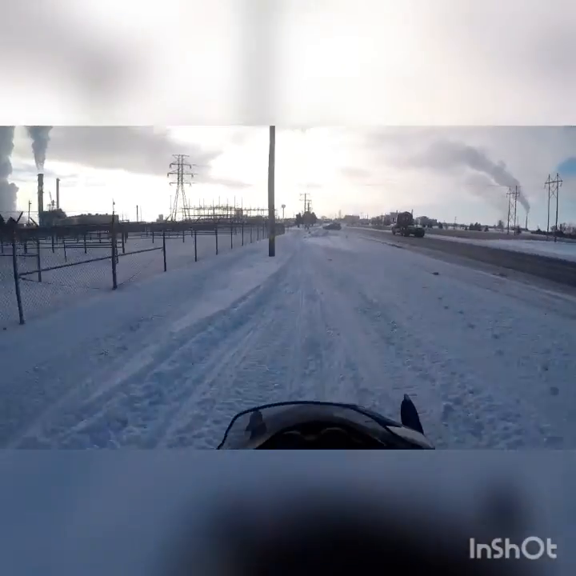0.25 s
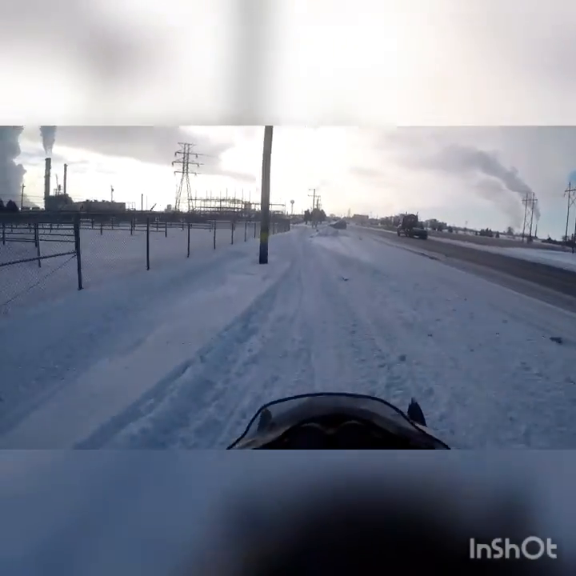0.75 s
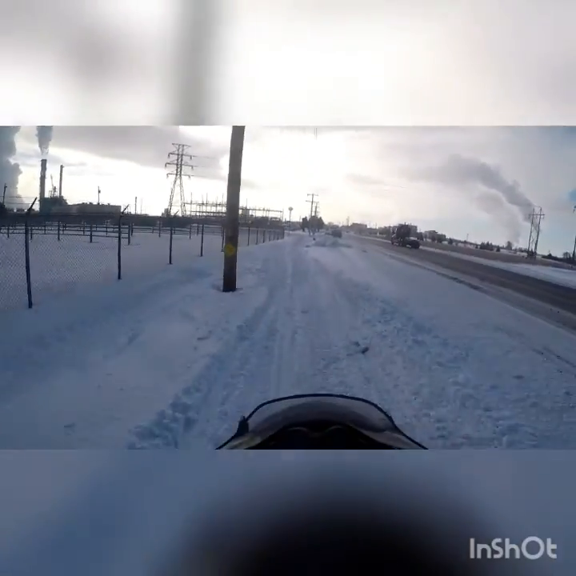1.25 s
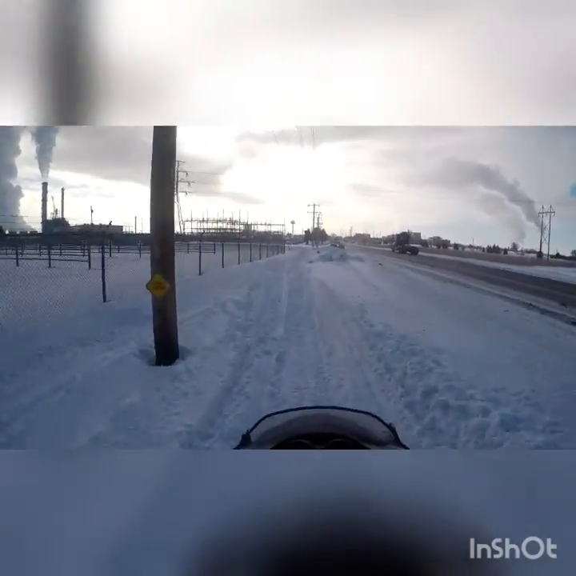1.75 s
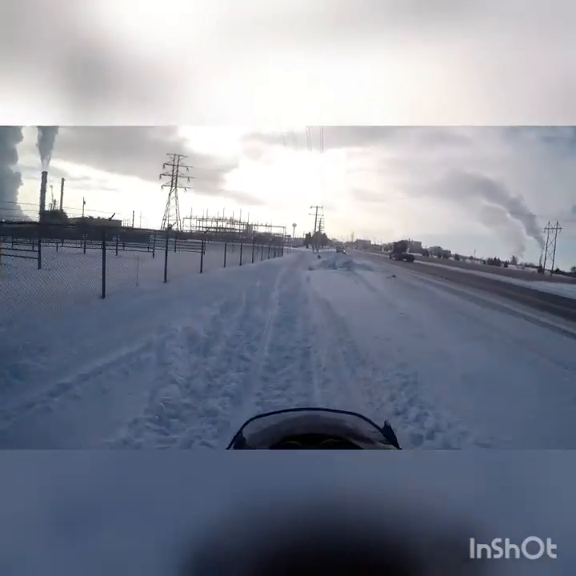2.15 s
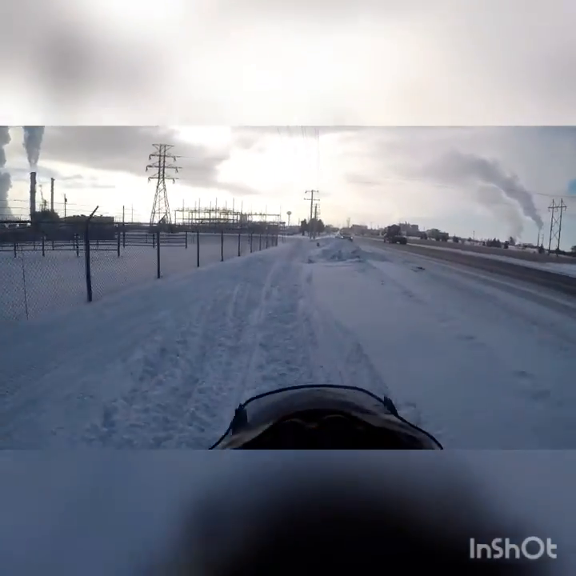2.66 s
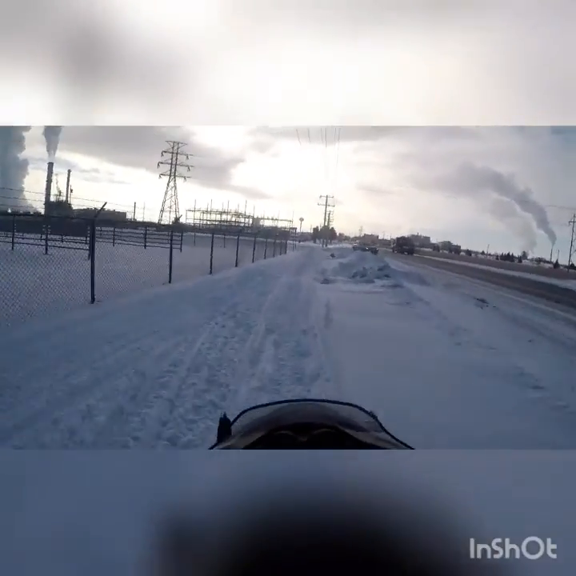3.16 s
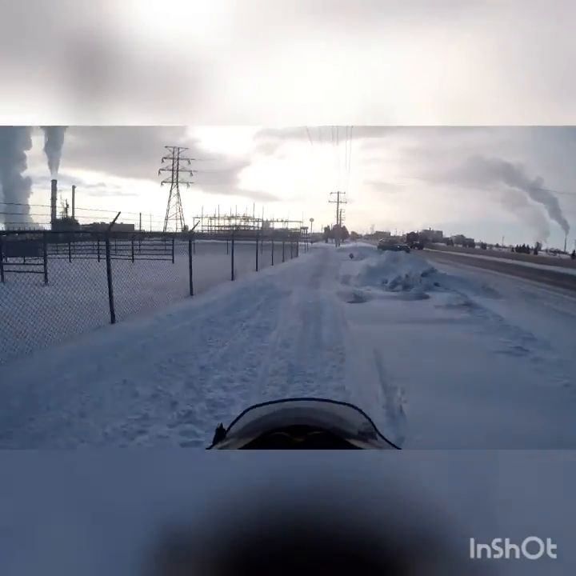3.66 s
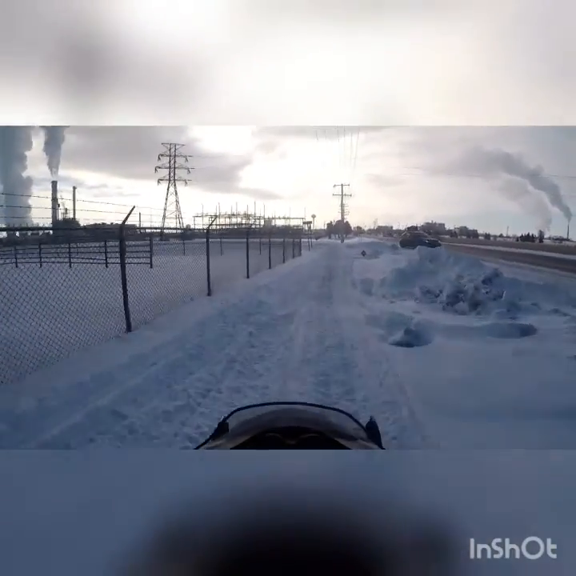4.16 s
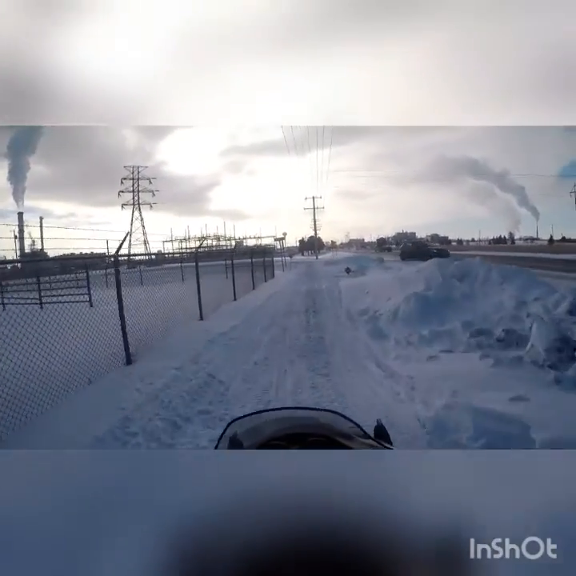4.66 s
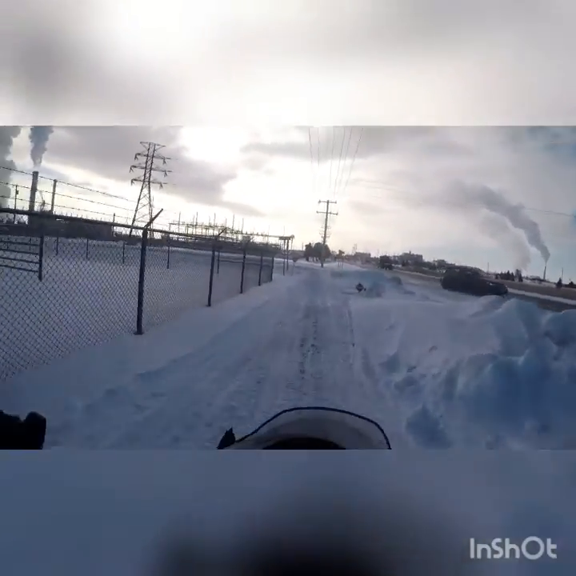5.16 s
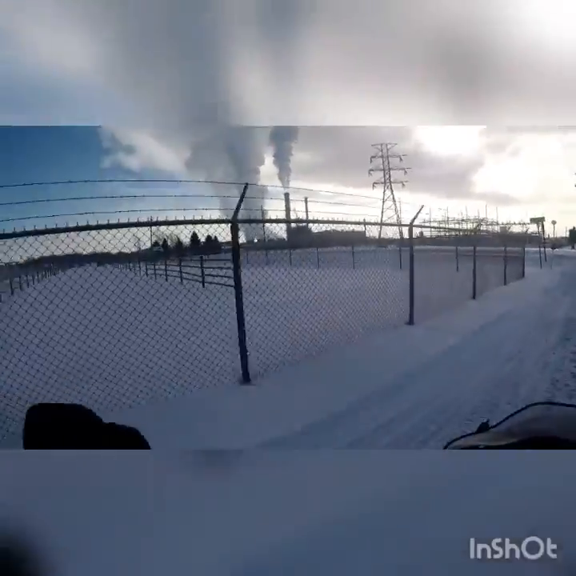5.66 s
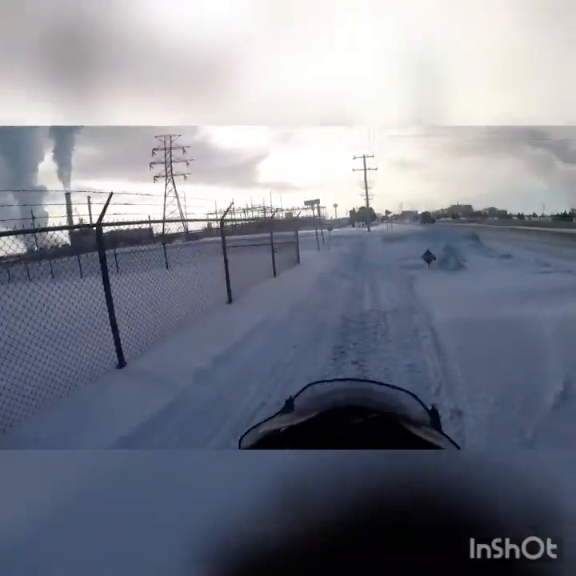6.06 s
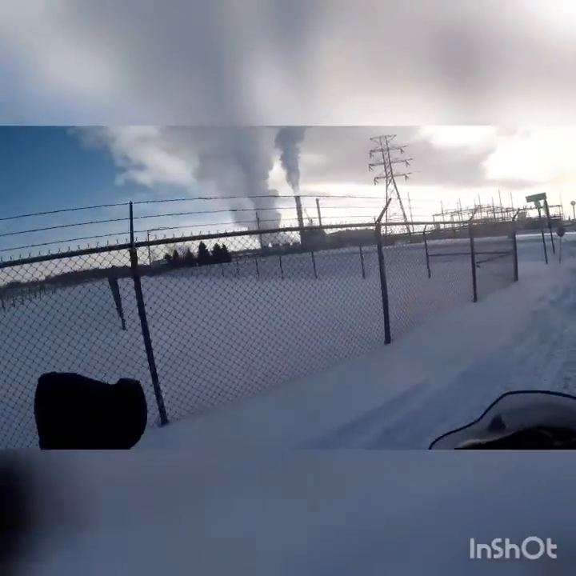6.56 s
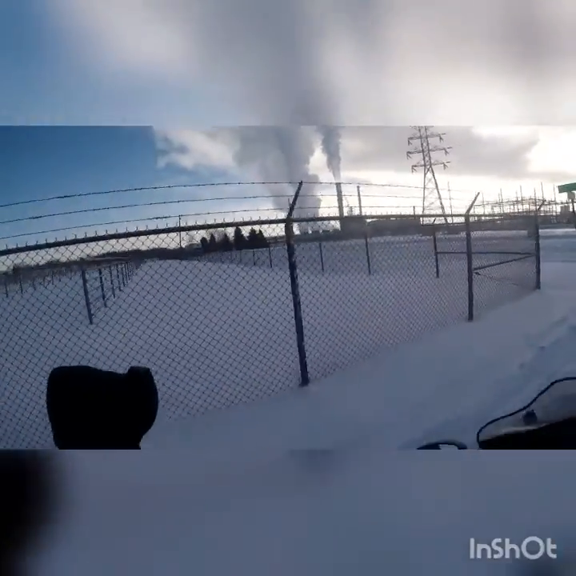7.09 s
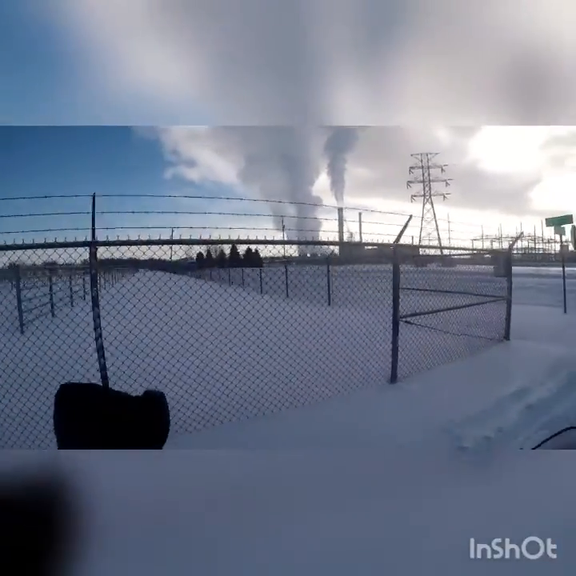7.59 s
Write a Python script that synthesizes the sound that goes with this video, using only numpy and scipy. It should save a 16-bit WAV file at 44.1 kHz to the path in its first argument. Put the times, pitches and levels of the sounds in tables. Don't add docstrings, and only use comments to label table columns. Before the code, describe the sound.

An onboard helmet microphone rides with a snowmobile on an open snowy track. From 0 s a raspy two-stroke engine drones, muffled and centred, over low wind rumble and a faint fluttering hiss of snow. Its pitch falls quickly in the first half second, then holds with small wavers; a barely audible knock comes at 0.8 s. Between about 3.15 and 3.6 s the sound opens into a much louder, wider stereo buzz, with strong track-belt boom and a hollow, resonant midrange. A hard low thump lands at 3.6 s, stronger on the left. From 3.4 to 6.1 s brief plastic rattles mark ruts. The engine sinks gradually to a lower, rough, steady drone by 5 s, lifting slightly around 6.8 s. A softer left-leaning knock and faint rattle come near 7.2 s; the drone continues to the end at about 7.8 s.

```python
import sys
import numpy as np
from scipy import signal
from scipy.fft import rfft, irfft, next_fast_len
from scipy.io import wavfile
from scipy.ndimage import uniform_filter1d

SR = 44100
rng = np.random.default_rng(int(sys.argv[2]) if len(sys.argv) > 2 else 0)


def level_to_linear(level):
    exponent = np.asarray(level, float) / 20
    return 10 ** exponent


def inscribe(sig):
    pcm = np.round(np.clip(np.atleast_2d(sig).T, -1, 1) * 32767)
    wavfile.write(sys.argv[1], SR, pcm.astype(np.int16))


N = 345303
TIME = np.arange(N) / SR
SIZE = next_fast_len(N + SR // 2)
HZ = np.arange(SIZE // 2 + 1) * SR / SIZE
STEREO_FROM_S, STEREO_FADE_S = 3.151, 0.46


# time_s, crank_hz, order3_db, order6_db, order7_db, order9_db
ENGINE_RUN = [(0.0, 77, 12, 13, 12, 20), (0.2, 72, 10, 11, 10, 19), (0.4, 68, 3, 12, 15, 18),
              (0.6, 67, 8, 11, 10, 17), (0.8, 68, 8, 12, 8, 16), (1.0, 68, 5, 13, 5.4, 17),
              (1.2, 66.4, 6, 15, 8, 14), (1.4, 63.5, -2, 12, 10, 13), (1.6, 65.5, 7, 11, 8.3, 16),
              (1.8, 65.0, 7, 11, 8, 20), (2.0, 67, 9.5, 12, 5, 22), (2.2, 69, 9.5, 10, 3.3, 20),
              (2.4, 69, 13.5, 7, 3, 25), (2.6, 70, 15, 9, 6, 20), (2.8, 67, 17.5, 11, 8, 16),
              (3.0, 65.2, 10.5, 11, 8, 16), (3.2, 64.7, 24, 10, 10, 16), (3.4, 66, 24.5, 13, 10, 15),
              (3.6, 64, 26.5, 13, 10, 18), (3.8, 63.4, 20, 15, 18, 15), (4.0, 63, 22.5, 15, 16, 12),
              (4.2, 60, 14, 16, 20, 17), (4.4, 59.4, 20, 16, 23, 14), (4.6, 59.5, 18, 18, 15, 17),
              (4.8, 56.5, 7, 14, 10, 11), (5.0, 56.4, 7, 18, 8.8, 10), (5.2, 56.3, 13, 16, 12, 9.6),
              (5.4, 56.2, 11, 12, 11, 9.6), (5.6, 56, 15, 11, 11, 13), (5.8, 55, 10, 11, 11, 13),
              (6.0, 55.6, 11, 16, 13, 15), (6.2, 56, 9, 13, 13, 19), (6.4, 55.6, 1.5, 15, 13, 19),
              (6.6, 57, 10.5, 15, 13, 22), (6.8, 59, 8.5, 14, 13, 17), (7.0, 57.7, 11.5, 12, 11, 22),
              (7.2, 57.8, 10.5, 12, 8, 19), (7.4, 56, 22, 11, 6, 16), (7.6, 56, 20, 13, 9, 17),
              (7.83, 55, 13, 15, 12, 19)]
# order, level_db
FAINT_ORDERS = [(1, 8), (8, 8.5), (10, 4.5), (12, 14.5), (14, 14.5), (15, 15.5), (18, 11)]


def engine_firing():
    crank_hz, *strong_db = in_time(ENGINE_RUN)
    crank = np.cumsum(crank_hz) / SR
    firing = 0
    for order, db in zip((3, 6, 7, 9), strong_db):
        firing = firing + tone(order * crank, db, wander_db=2.0, jitter=0.4)
    for order, db in FAINT_ORDERS:
        firing = firing + tone(round(order) * crank, db, wander_db=4.5, jitter=0.6)
    return crank, firing


def engine_roar(crank):
    puff = 1 + 0.2 * np.cos(2 * np.pi * 3 * crank) + 0.14 * np.cos(2 * np.pi * crank)
    return level_to_linear(-1.0) * puff * roar(flutter_db=0.95, rate=11)


# time_s, beat_hz, second_order_db, one_beat_below_db, one_beat_above_db, twice_the_lugs_db
TRACK_RUN = [(0, 9.6, 1, 6, 4.5, 10), (1, 9.6, 4, 8, 8, 12), (1.6, 9.6, 6, 6, -1, 17.6),
             (1.9, 9.6, -3, 20, 4.5, 14.6), (2.3, 14, 1, 10, -3, 7.2), (2.8, 17, -1, 14.6, 4, 13),
             (3.4, 17, 6, 12.3, 0.5, 10), (3.7, 11, 9.5, 7.8, 7, 14), (4.2, 10, 9, 15.5, -3.5, 6.6),
             (4.6, 10, 9, 8, 0, 8.9), (4.9, 9.6, 11, 6.6, 7, 15.7), (5.2, 9.2, 7, 13.4, 3, 10),
             (5.6, 11.5, 12.5, 4, 13.5, 14), (6, 12, 12, 5.6, 8, 12.3), (6.3, 12.5, 11.5, 7.2, 10.5, 11),
             (6.6, 9, 8, 12.8, 4, 6.6), (7, 9.6, 12, 13, -1, 7.2), (7.4, 8.5, 14, 12, 9, 12),
             (7.83, 9.5, 11.5, 8.6, 2, 8.8)]


def track(crank):
    beat_hz, second_db, below_db, above_db, twice_db = in_time(TRACK_RUN)
    beat = np.cumsum(beat_hz) / SR
    second = 2 * crank
    boom = tone(second, second_db, wander_db=3.0, jitter=0.58)
    boom += tone(second - beat, below_db, wander_db=3.0, jitter=0.58)
    boom += tone(second + beat, above_db, wander_db=3.0, jitter=0.58)
    return boom + tone(2 * (second - beat), twice_db, wander_db=4.0, jitter=0.8)


def low_rumble():
    return level_to_linear(-3) * roar(flutter_db=0.5, rate=8)


# start_s, left_peak_db, right_peak_db, pitch_hz, t60_s
CHASSIS_KNOCKS = [
    (.84, -26, -26, 158, 0.13),
    (3.604, -6, -12.5, 150, 0.093),
    (7.171, -9, -16, 168, .1),
]


def knocks():
    out = np.zeros((2, N))
    for start_s, left_db, right_db, pitch_hz, t60_s in CHASSIS_KNOCKS:
        t = np.maximum(TIME - start_s, 0)
        swell = 1 - np.exp(-t / 0.0033)
        ring = swell * level_to_linear(-60 * t / t60_s) * np.sin(2 * np.pi * pitch_hz * t)
        right_sign = -1 if start_s > STEREO_FROM_S else 1
        out += ring * np.array([[level_to_linear(left_db)], [level_to_linear(right_db) * right_sign]])
    return out


# centre_s, rms_db, length_s
RUT_JOLTS = [(3.412, -41, 0.034), (3.596, -40, 0.055), (3.708, -39.5, 0.033), (3.966, -43, 0.027),
             (4.25, -36.5, .06), (4.398, -36, 0.027), (4.74, -41.5, 0.033), (5.033, -39, 0.042),
             (5.192, -37, 0.032), (5.25, -41.5, 0.034), (5.55, -45, 0.032), (5.83, -40, .03),
             (5.962, -36, 0.039), (6.08, -48.5, .03), (7.25, -45.5, 0.043)]
# pitch_hz, width_hz, level_db, right_sign
SHELL_MODES = [
    (2500, 260, -3.5, -1),
    (1690, 120, -1, 1),
    (5000, 5000, -27, -1),
]


def rattle():
    shake = sum(level_to_linear(db) * np.exp(-(2 * (TIME - s) / length_s) ** 2) for s, db, length_s in RUT_JOLTS)
    out = np.zeros((2, N))
    for pitch_hz, width_hz, db, sign in SHELL_MODES:
        r = np.exp(-np.pi * width_hz / SR)
        poles = [1, -2 * r * np.cos(2 * np.pi * pitch_hz / SR), r * r]
        ring = signal.lfilter([1, 0, -1], poles, rng.standard_normal(N))
        out += level_to_linear(db) * ring / ring.std() * np.array([[1], [np.sign(sign)]])
    return out * shake


def snow_hiss():
    return roar(flutter_db=1.22, rate=7.8)


def port_turbulence():
    return roar(flutter_db=1.25, rate=14)


def roar(flutter_db, rate):
    return rng.standard_normal(N) * np.sqrt(SR / 2) * level_to_linear(flutter_db * drift(rate))


def tone(turns, db, wander_db, jitter):
    level = np.sqrt(2) * level_to_linear(db + wander_db * drift(4.4))
    return level * np.sin(2 * np.pi * turns + jitter * drift(4))


def drift(rate):
    r = np.exp(-80 * np.pi * rate / SR)
    slow = signal.lfilter([1], [1, -2 * r, r * r], rng.standard_normal(N // 40 + 2002))[2000:]
    return np.interp(np.arange(N) / 40, np.arange(len(slow)), slow / slow.std())


def in_time(rows):
    s, *columns = np.transpose(rows)
    return [np.interp(TIME, s, c) for c in columns]


def stereo_share():
    return np.clip((TIME - STEREO_FROM_S) / STEREO_FADE_S, 0, 1)


def evened(x, span_s):
    power = np.mean(x ** 2, axis=0)
    span = int(span_s * SR)
    slow = uniform_filter1d(uniform_filter1d(power, span), span)
    return x * np.sqrt(power.mean() / (slow + 1e-14))


def to_ports(shared, own, path, level_db, low_hz, high_hz, even_s):
    hz, *columns = np.transpose(path)
    mono_db, left_db, right_db, alike, lead = [np.interp(np.log(HZ + 1), np.log(hz + 1), c) for c in columns]
    alike = np.clip(alike, 0, 1)
    band = (HZ >= low_hz) & (HZ < high_hz)
    a = rfft(shared, SIZE) * band
    b = rfft(own, SIZE) * band
    mono = irfft(a * level_to_linear(mono_db), SIZE)[:N]
    left = irfft(a * level_to_linear(left_db), SIZE)[:N]
    at_right = alike * np.exp(1j * lead) * a + np.sqrt(1 - alike ** 2) * b
    right = irfft(at_right * level_to_linear(right_db), SIZE)[:N]
    pair = np.array([left, right])
    wide = stereo_share()
    return level_to_linear(level_db) * ((1 - wide) * evened(mono[None], even_s) + wide * evened(pair, even_s))


# time_s, wind_db, track_boom_db, exhaust_db, intake_roar_db, snow_hiss_db
SWELLS = [(0.0, 4, -1, 3, 2.5, 7), (0.125, -4, -3.3, 0.7, 1.2, 5), (0.25, -7, -4, 1, 1.5, 1.1),
          (0.375, 3, -7.5, 0, 1.2, 1.8), (0.5, -3, -2, 1.5, 0.5, 2.5), (0.625, 0, -4.5, -0.3, -0.5, 1.3),
          (0.75, -2, 1, 2.5, 1, 1.3), (0.875, 0, -2, -1.3, 0.5, 1.5), (1.0, 0, -3, -0.5, 1, 0.5),
          (1.125, -1, -6, 0.1, 0.5, 1.3), (1.25, -2.5, -1, -1.5, -1.5, -1.4),
          (1.375, -6.7, -1.5, 0, -1, -1), (1.5, 7, -2.5, -2, -0.5, -2.5),
          (1.625, -4.5, -1.5, -0.4, 0.5, -2), (1.75, 1, -1, -1.5, -0.5, 0.7),
          (1.875, 2.6, 3, -0.2, 0.2, -1), (2.0, 5.5, 1.5, 1, 0, -2), (2.125, 6.5, 2.9, -2.5, -1.5, -3.5),
          (2.25, 3.5, -5, 0.7, -0.6, -3.5), (2.375, 7, 2.5, -1.5, 2, -1.5), (2.5, 0, -0.5, -0.5, 1.3, -1.5),
          (2.625, -2.5, 1.5, 0.5, -0.2, -2.5), (2.75, 5, -2, -1.5, -0.5, -2.5),
          (2.875, -2, 3.5, -1, -0.5, -2.5), (3.0, 4.5, 1, -3, -3, -5.5), (3.125, 3.9, -2.5, -1, -2, -3.5),
          (3.25, -2.5, -4.5, -2.1, -2, -2.5), (3.375, -2.8, -6.5, 2.5, -3, -1.5),
          (3.5, -0.5, -4.5, -2, -3.5, 0.8), (3.625, 1, -6, -2, -1.5, 0.5), (3.75, -3.5, -4.9, -2, -3, 2),
          (3.875, 0, -2.5, -1, -1.5, 1.5), (4.0, -0.5, -4.2, 0.5, -1, 0.5), (4.125, 2.5, 0.3, 2, -0.5, 1.5),
          (4.25, -2, 1, -0.5, 1, 1.8), (4.375, -2, -2, 2, 0.2, -1), (4.5, 5, -4, 2, -1.5, 0),
          (4.625, 2, -0.9, 2.5, -0.5, 1.5), (4.75, 0, -0.1, 2, 1, 1), (4.875, 5.5, -2, -1, -1.5, -0.5),
          (5.0, -0.8, -2.2, 1.5, 0.5, 2), (5.125, 2.5, 3.6, 0.5, -0.5, 0.9), (5.25, 3.5, -0.8, 0, 1.3, 1.5),
          (5.375, -1, -0.5, 0, -1.8, -1.8), (5.5, 0, -1.2, -3.5, 0.4, -0.5),
          (5.625, -3, 1.0, -4.5, -2.4, -1.7), (5.75, 4, -2, -3.5, 0.4, -1.3),
          (5.875, -1.5, 1, -1.5, -1.3, 0), (6.0, -2.9, -1.6, -0.3, 0.5, -0.8),
          (6.125, -1.6, -1.0, 0, -1, 1.3), (6.25, -5, 0.7, -0.5, 0.5, 0), (6.375, 2, -1, -0.5, 0, 1.0),
          (6.5, -5, -0.2, 0, -0.5, 0.4), (6.625, 2, 0.5, -4, 1, -0.5), (6.75, -2.5, 0.6, -1.5, 1, 0.5),
          (6.875, -5, 0.2, -2, -0.4, -0.3), (7.0, 2, 1, -1.5, 1, -1), (7.125, -2, 0.8, -2.5, -0.2, 0.5),
          (7.25, 1.5, 1.8, -2.5, 1.5, -1), (7.375, 3, -0.8, -2.7, 0.7, -0.7),
          (7.5, -2.6, -1.5, -3, 0.5, -1.5), (7.625, -4, -0.8, -3.5, -1, -1),
          (7.75, -1.5, -1, -2, 1.1, -0.3), (7.83, 0, 0.5, 3.5, 3, 0.1)]
# pitch_hz, one_channel_db, left_db, right_db, likeness_0_to_1, right_lead_rad
BASS_TO_PORTS = [(11, -47.5, -46.5, -47.5, 0.85, -1.5), (22.3, -45.5, -43, -40.5, 0.7, 1.5),
                 (33.8, -43.5, -38, -26, 0.9, -0.8), (43.7, -54.5, -38.5, -39.5, 0.8, 0),
                 (54.4, -64.5, -44.5, -45.5, 0.7, 1.0), (76, -60, -49.5, -45, 0.6, 1),
                 (87, -61.5, -44, -41, 0.3, 0.7), (101, -60, -29.5, -41, 0.63, -3.5),
                 (115, -51, -27, -37, 0.97, -3.5), (127.9, -55.5, -31.5, -37.5, 0.98, -4.5),
                 (150, -60, -50, -53, 0.7, -5), (185.4, -64, -48.5, -52, 0.5, -7.5),
                 (213, -68.5, -49, -56, 0.76, -7), (255, -67, -59.5, -54.5, 0.6, -7.8)]
EXHAUST_TO_PORTS = [(250, -64, -62, -60, 0.31, 0), (312, -72, -71.5, -71.5, 0.2, -3.5),
                    (344, -71, -58.5, -56, 0.93, -3), (383, -74, -65.5, -64.5, 0.87, -3.5),
                    (443, -72.5, -53, -51, 0.99, -3), (478, -77.5, -57, -57, 0.99, -3.5),
                    (516, -76.5, -54, -53.5, 0.99, -2.5), (568, -77.5, -62, -61.5, 0.95, -3.5),
                    (663, -78.5, -61, -59, 0.97, -3), (713, -81.5, -70.5, -68, 0.94, -3),
                    (850, -80.5, -60, -62, 0.97, -3.0), (968, -77.5, -60, -59.5, 1, -3),
                    (1096, -65.5, -45, -46, 0.99, -2.5), (1215, -69, -51, -57, 1, -2.5)]
INTAKE_TO_PORTS = [(1230, -67.5, -56, -51, 0.89, -2), (1301, -70.5, -53, -52.5, 0.97, -2),
                   (1414, -81.5, -61, -61.5, 0.31, -3), (1550, -76, -64.5, -62.5, 0.29, 0.5),
                   (1710, -77.5, -62.5, -63, 0.67, 0.5), (1904, -84, -74.5, -77, 0.2, 2.7),
                   (2080, -82, -76.5, -69, 0.51, 2), (2380, -87, -73.5, -75, 0.54, 3.7),
                   (2670, -82.5, -77, -75.5, 0.23, 2), (2945, -87, -77.5, -73, 0.42, -2),
                   (3200, -96.5, -77.5, -78, 0.74, 2.5), (3500, -89, -84.5, -89, 0.33, 0.5),
                   (3800, -96, -81.5, -89, 0.57, 4), (4300, -94, -91.5, -93, 0.12, 2)]
HISS_TO_PORTS = [(4300, -96, -92.5, -99.5, 0.12, -2), (5060, -93.5, -86.5, -97, 0.25, 3.5),
                 (5540, -84, -88, -90, 0.36, 4.5), (5800, -77.5, -82.5, -83.5, 0.54, 3),
                 (6270, -82.5, -87.5, -88.5, 0.17, 0), (7000, -89.5, -93.5, -91.5, 0.27, 5),
                 (7530, -94.5, -91.5, -85.5, 0.23, 6), (7970, -94.5, -100, -93.5, 0.07, -5),
                 (9000, -95, -100, -97, 0.09, -11), (10120, -100, -102, -100, 0.12, -12),
                 (11000, -106, -108, -107, 0.07, 2), (12000, -106, -113, -106, 0.04, -4),
                 (13500, -112, -113, -112, 0.01, -2.1), (15200, -121, -138, -134, 0.47, -1)]


def scene():
    wind_db, boom_db, exhaust_db, intake_db, hiss_db = in_time(SWELLS)
    crank, firing = engine_firing()
    engine = firing + engine_roar(crank)
    chassis = firing + track(crank) + low_rumble()
    own = port_turbulence()
    out = to_ports(engine, own, EXHAUST_TO_PORTS, exhaust_db, 250, 900, even_s=0.15)
    out += to_ports(engine, own, EXHAUST_TO_PORTS, intake_db, 900, 1220, even_s=0.21)
    out += to_ports(engine, own, INTAKE_TO_PORTS, intake_db, 1220, 4310, even_s=0.16)
    out += to_ports(chassis, own, BASS_TO_PORTS, boom_db, 80, 250, even_s=0.16)
    out += to_ports(chassis, own, BASS_TO_PORTS, wind_db, 9, 80, even_s=0.22)
    out += to_ports(snow_hiss(), own, HISS_TO_PORTS, hiss_db, 4300, 15300, even_s=0.12)
    return out + knocks() + rattle()


def low_pass(x):
    return signal.sosfilt(signal.butter(12, 15170, fs=SR, output="sos"), x)


def record(dry):
    mix = 0.96 * np.tanh(dry / 0.97)
    return low_pass(mix)


dry = scene()
out = record(dry)
inscribe(out)
```